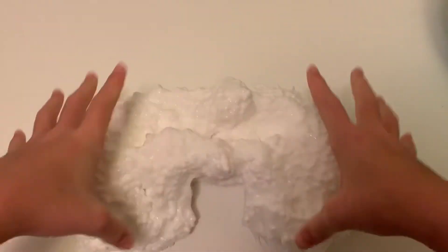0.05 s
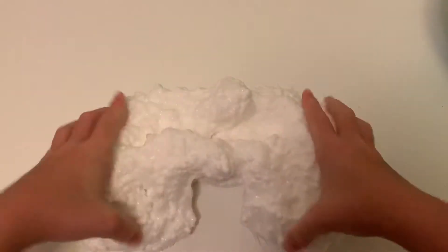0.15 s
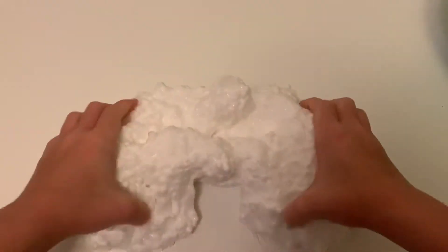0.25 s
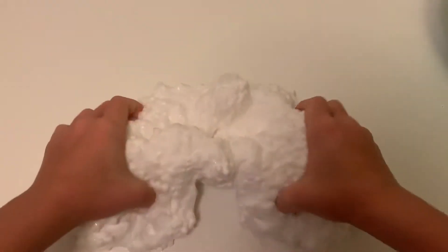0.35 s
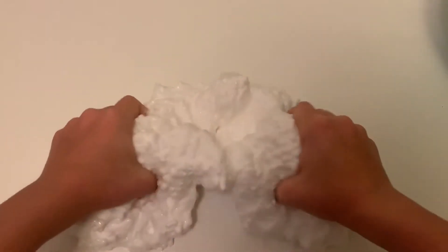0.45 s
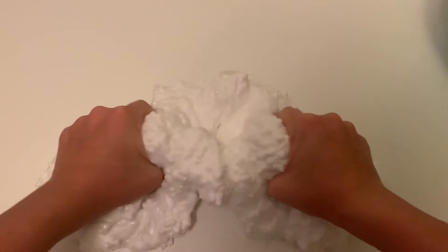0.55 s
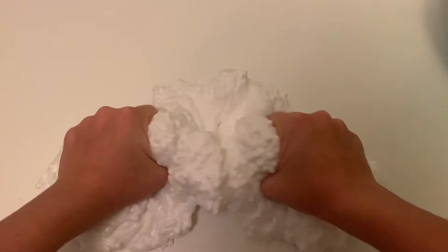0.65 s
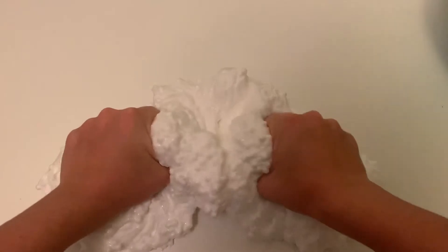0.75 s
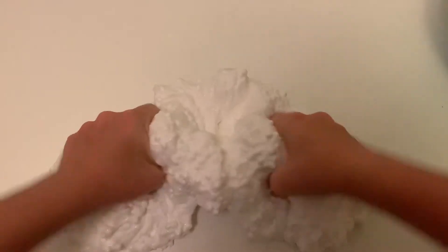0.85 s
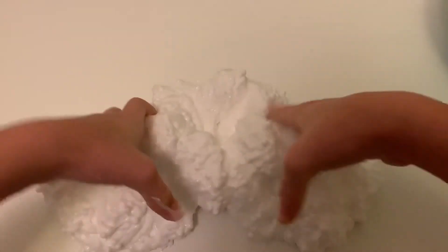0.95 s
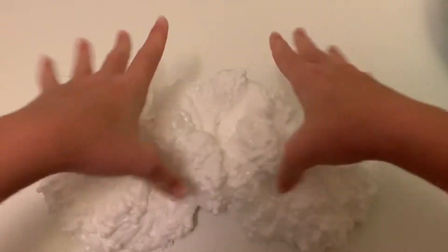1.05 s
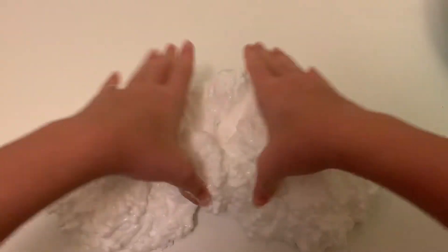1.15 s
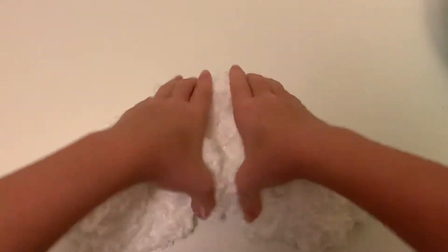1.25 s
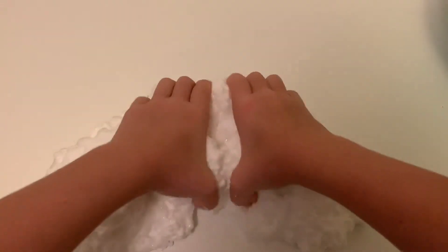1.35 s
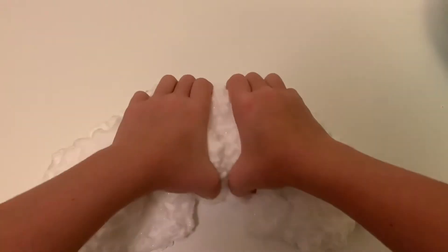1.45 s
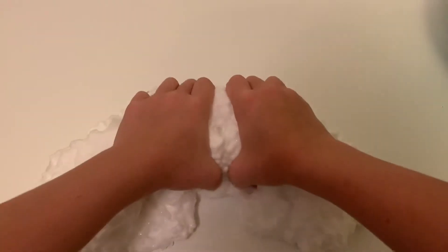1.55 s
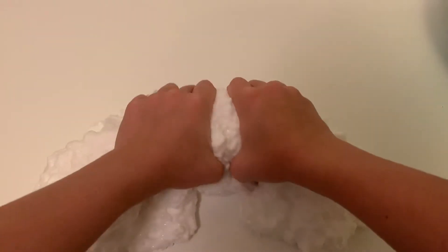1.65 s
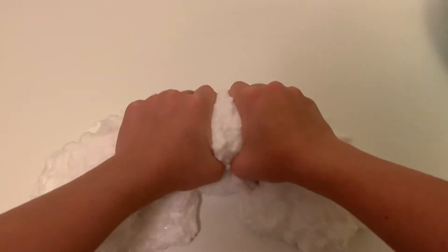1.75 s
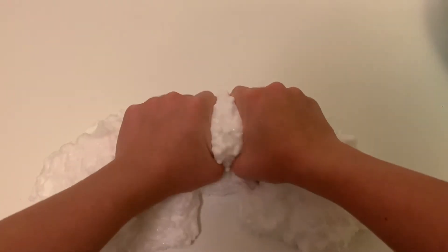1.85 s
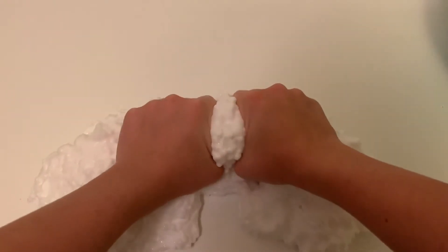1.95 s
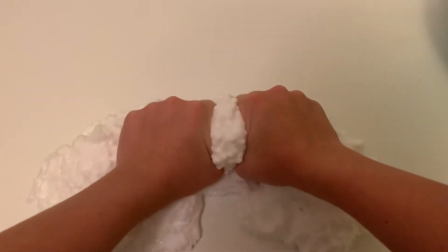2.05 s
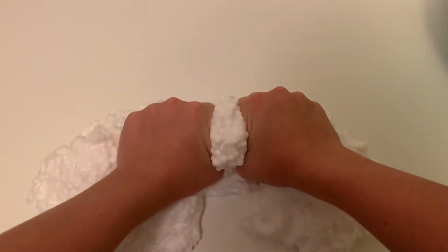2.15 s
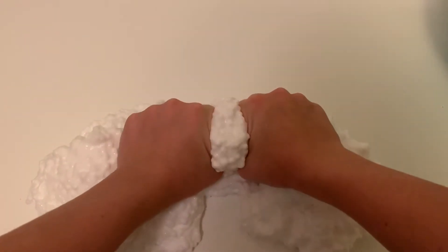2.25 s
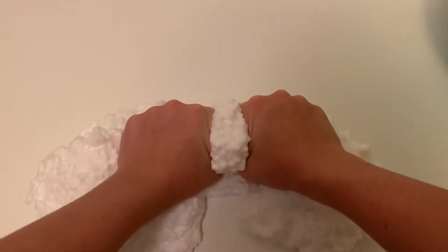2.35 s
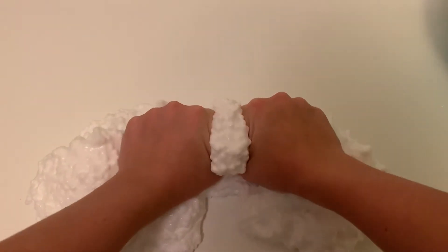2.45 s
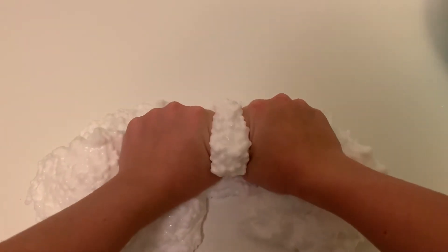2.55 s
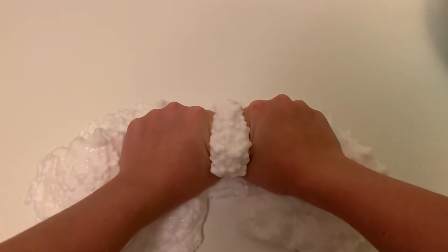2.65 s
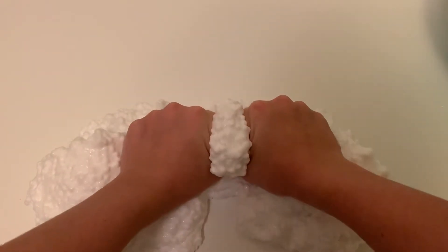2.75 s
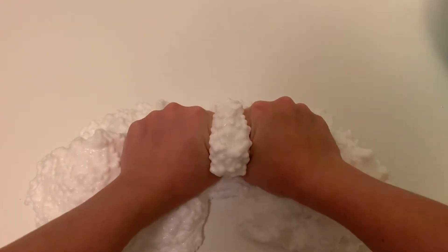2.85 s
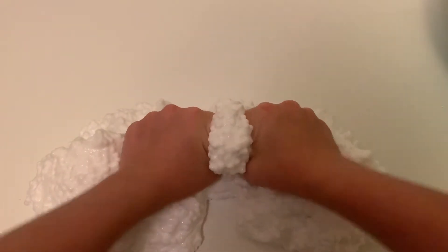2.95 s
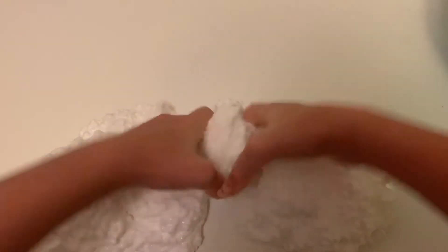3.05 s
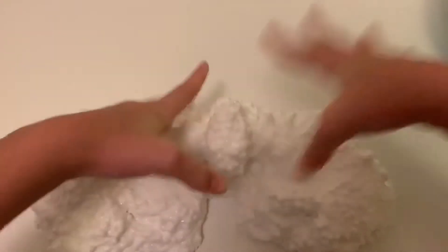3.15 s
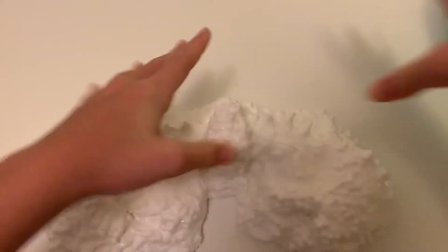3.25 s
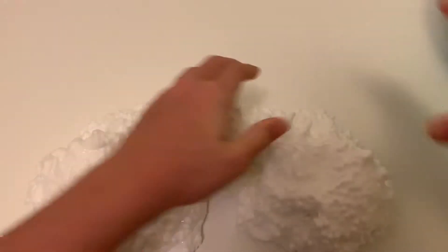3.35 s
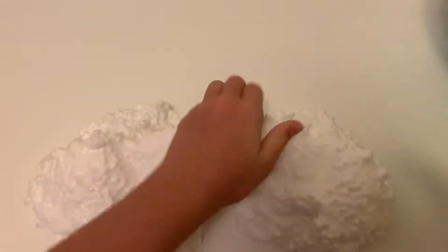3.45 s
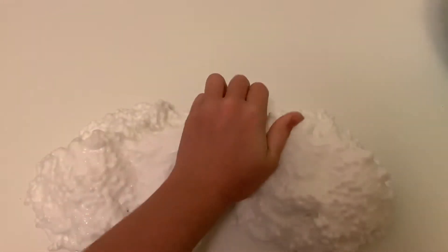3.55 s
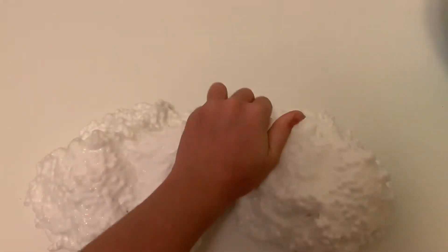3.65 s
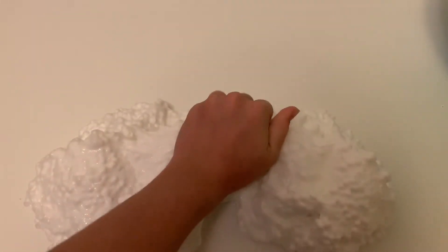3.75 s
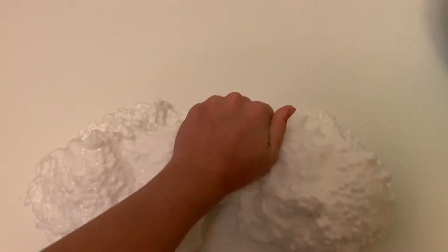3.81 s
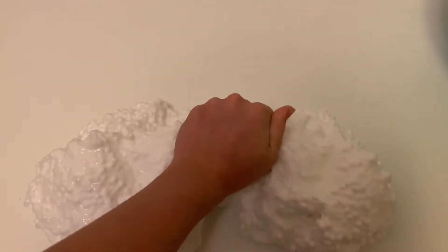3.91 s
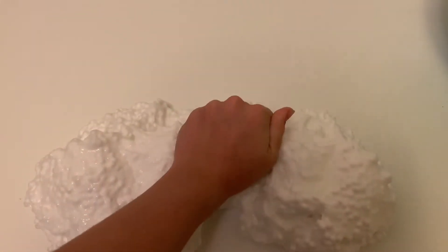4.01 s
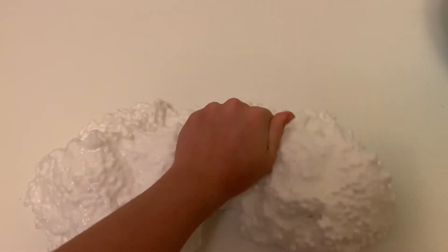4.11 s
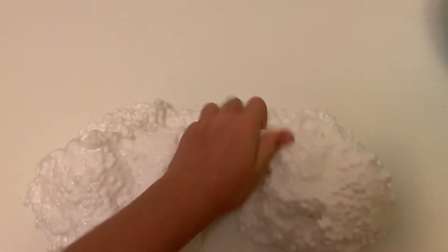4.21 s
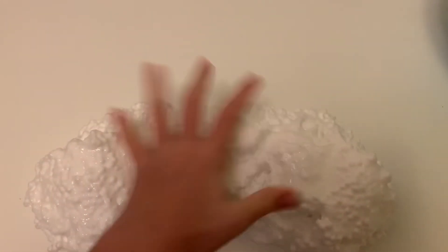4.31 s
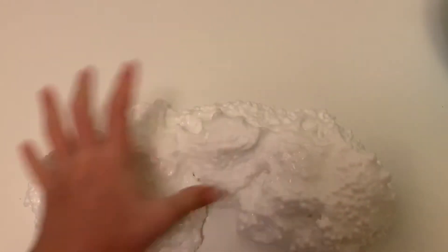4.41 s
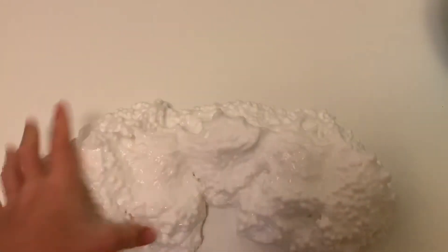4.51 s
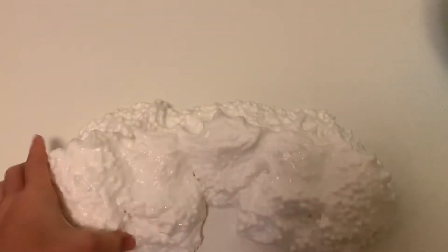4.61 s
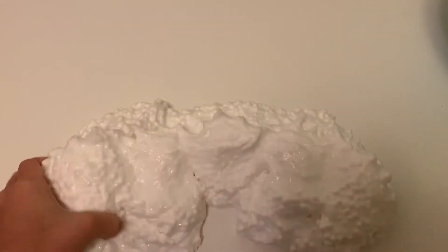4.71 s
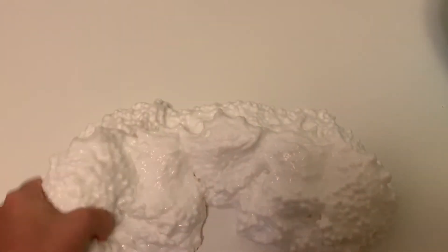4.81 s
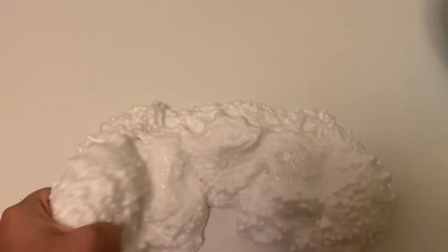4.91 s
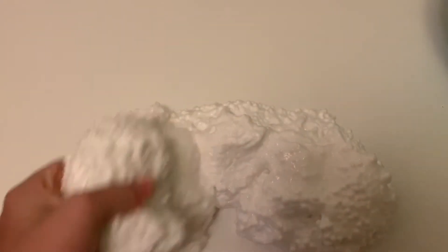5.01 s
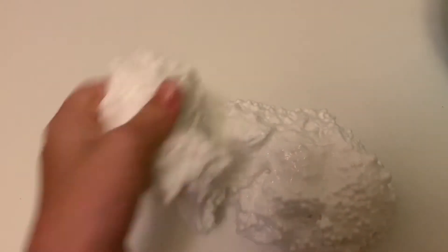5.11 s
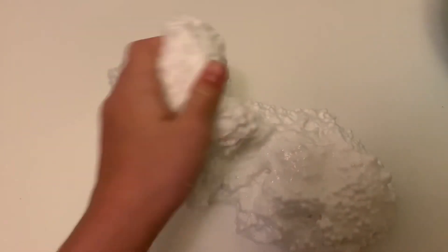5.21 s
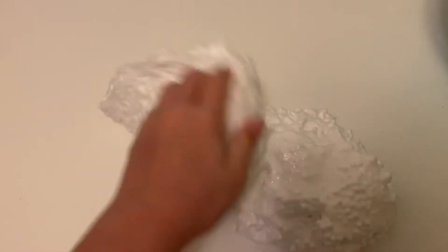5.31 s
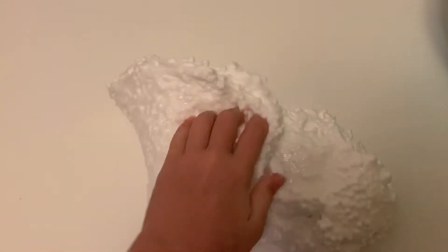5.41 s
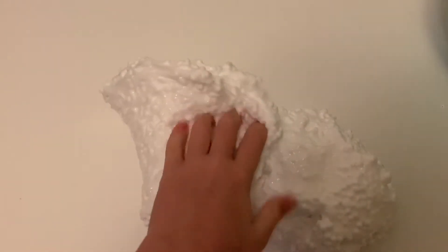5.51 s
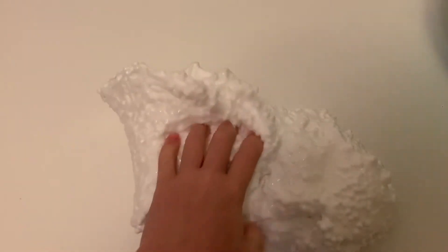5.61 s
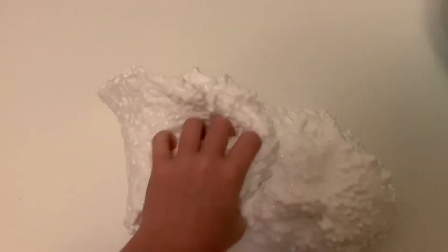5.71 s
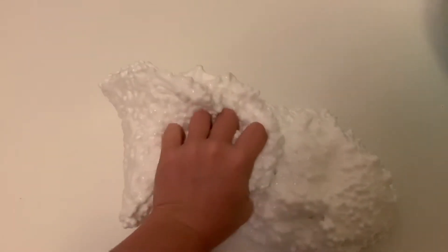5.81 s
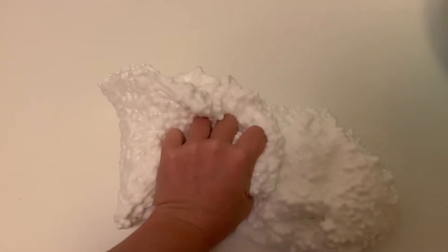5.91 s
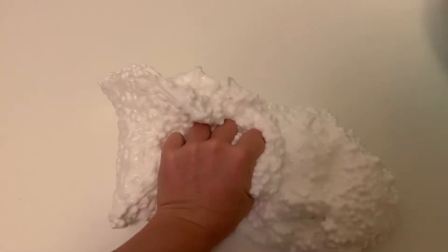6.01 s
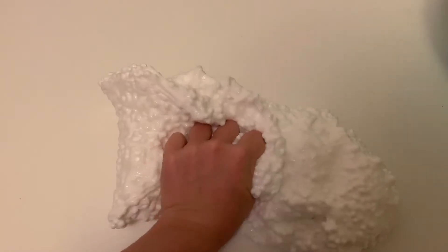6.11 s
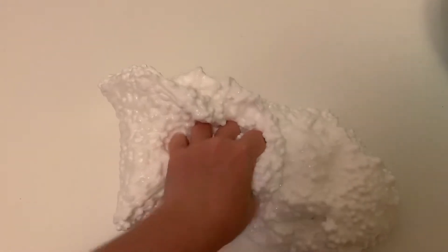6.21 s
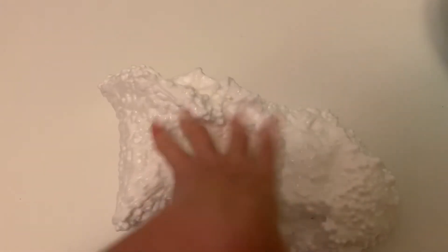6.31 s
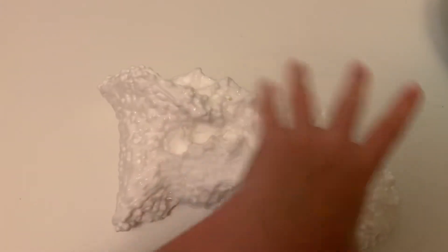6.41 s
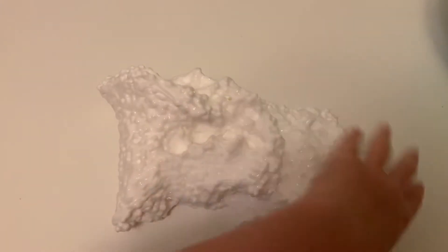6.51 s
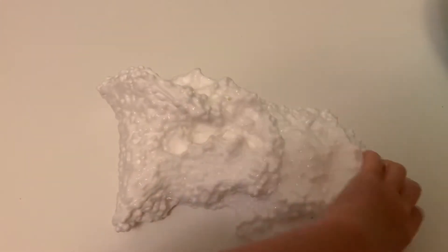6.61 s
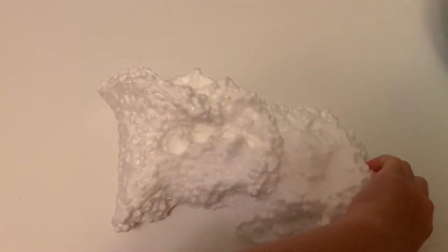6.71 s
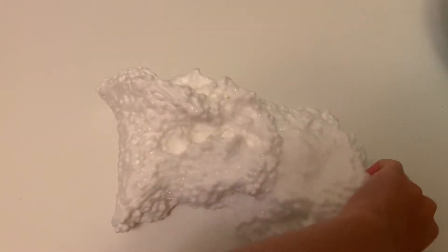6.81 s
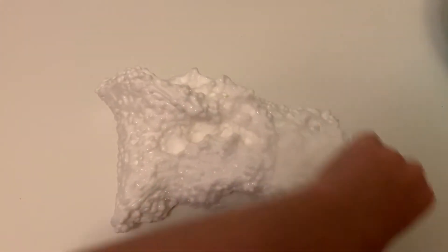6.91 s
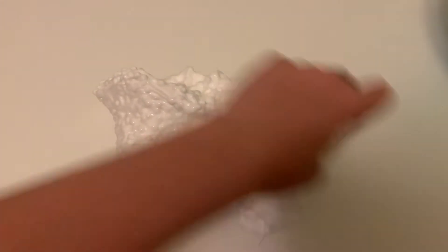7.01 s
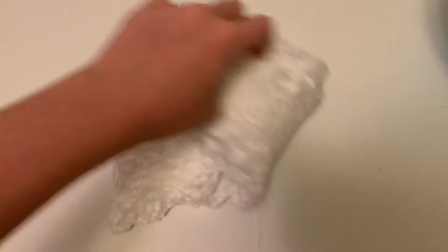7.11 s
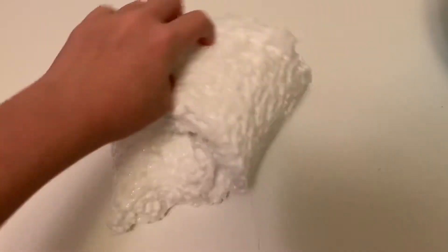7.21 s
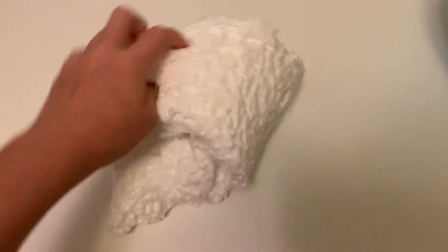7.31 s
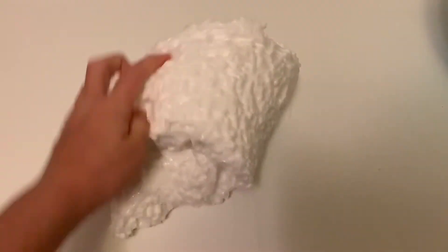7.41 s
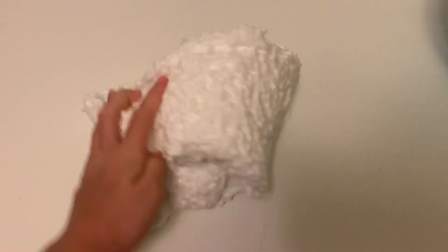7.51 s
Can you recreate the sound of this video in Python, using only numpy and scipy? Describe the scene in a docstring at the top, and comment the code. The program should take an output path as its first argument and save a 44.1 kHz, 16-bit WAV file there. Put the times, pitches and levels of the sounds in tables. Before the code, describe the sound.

Hands squeeze and peel bead-filled slime on a table, giving dense wet crunchy crackles, sharp popping air bubbles and sticky tearing, very close in stereo.

```python
"""Hands squeeze, press and peel a bead-filled slime on a table in a small room, near a pair of microphone ports.
From the start, a faint room hush (shaped noise) and low gusts of air pushed by the hands (enveloped noise)
lie under the crackle of tearing films, a random train of small bursts. From 0.2 s trapped air pockets burst as
single pops: film snap, ringing pocket, slime thump. From 0.9 s hands also pull off the sticky surface;
near 4.6 s and 6.7 s the batch is peeled off the table, whose top booms as band-shaped noise."""
import sys
import numpy as np
from scipy import signal
from scipy.fft import rfft, irfft
from scipy.io import wavfile
from scipy.ndimage import uniform_filter1d

SR = 44100
rng = np.random.default_rng(int(sys.argv[2]) if len(sys.argv) > 2 else 0)


def wav_out(sig):
    """Save sig, one row per channel (or a flat mono array), as 16-bit PCM at SR to the path in sys.argv[1]."""
    wavfile.write(sys.argv[1], SR, np.round(np.clip(np.atleast_2d(sig).T, -1, 1) * 32767).astype(np.int16))


N = 333396
PLACES = 6  # places in the slime where bursts arise
BURST_SAMPLES = 600
REFERENCE_HZ = 2600  # pocket pitch at which the size laws are neutral


def gain_of(db):
    """A level in decibels is twenty times the logarithm of an amplitude gain."""
    return 10 ** (np.asarray(db) / 20)


def evened(x):
    """Normalization: scales a signal to rms 1."""
    return x / np.sqrt(np.mean(x ** 2) + 1e-30)


def read(points, hz):
    """Interpolation of a spectrum on a logarithmic frequency axis."""
    f, value = np.transpose(points)
    return np.interp(np.log(hz + 1), np.log(f + 1), value)


def coloured(x, points):
    """Linear filtering: multiplies the spectrum by a tabulated gain."""
    hz = np.fft.rfftfreq(len(x), 1 / SR)
    return irfft(rfft(x) * gain_of(read(points, hz)), len(x))


def add(mix, s, sound):
    """Superposition: mixes a sound in at s seconds."""
    part = mix[round(s * SR):][:len(sound)]
    part += sound[:len(part)]


# spectral density of the room hush: (frequency [Hz], relative level [dB per Hz])
HUSH_COLOUR = [(60, -24), (120, -18.5), (400, 3), (1000, -5.5), (3000, -16), (6000, -18.5), (9000, -22),
               (12500, -20.5), (14000, -66)]
HUSH_DB = -78.5


def hush():
    """Stationary noise: a steady random signal is described by its spectral density."""
    return gain_of(HUSH_DB) * evened(coloured(rng.standard_normal(N), HUSH_COLOUR))


# spectral density of the moving air: (frequency [Hz], relative level [dB per Hz])
RUMBLE_COLOUR = [(12, -10.5), (20, 5), (38, -3.5), (86, -2), (200, -24), (234, -56), (300, -38.5),
                 (390, -61), (660, -120)]
# gusts from the moving hands: (time of the crest [s], level of the shared part [dB])
GUSTS = [(0.088, -46), (.42, -57.5), (.96, -52.5), (1.09, -52.5), (1.41, -68), (2.781, -69), (3.16, -49),
         (3.33, -46), (3.38, -42.5), (3.45, -50), (3.56, -58.5), (3.749, -66), (4.32, -58), (4.67, -58.5),
         (5.03, -58), (5.472, -61.5), (5.769, -52), (6.3, -59), (6.439, -51), (6.721, -59), (6.951, -59),
         (7.07, -57), (7.222, -56)]
GUST_RISE_DB_PER_S, GUST_FALL_DB_PER_S, CALM_DB = 168, 177, -72


def air():
    """Coherence: low gusts share most of their noise between the ports, with a small opposed part."""
    shared, opposed = (evened(coloured(v, RUMBLE_COLOUR)) for v in rng.standard_normal((2, N)))
    db = np.full(N, float(CALM_DB))
    for s, top_db in GUSTS:
        late = np.arange(N) / SR - s
        drop_db = np.maximum(GUST_FALL_DB_PER_S * late, -GUST_RISE_DB_PER_S * late)
        db = np.maximum(db, top_db - drop_db)
    return gain_of(db) * np.array([shared + 0.28 * opposed, shared - .24 * opposed])


STILL_DB = -81.5  # level from which each gesture rises
RISE_BEND = 0.55  # under 1 the rise is quick, then eases


def gesture(t, start, fullest, end, full_db, end_db, fall):
    """Power envelope of one layer through one gesture: rise, linear drift in decibels, exponential decay."""
    rise = np.clip((t - start) / (fullest - start), 0, 1)
    drifting_db = np.interp(t, [fullest, end], [full_db, end_db])
    db = STILL_DB + (drifting_db - STILL_DB) * rise ** RISE_BEND
    return (rise > 0) * gain_of(2 * (db - fall * np.maximum(t - end, 0)))  # doubled dB gives power


# hands pressing in: (start [s], fullest [s], end [s], pocket level at fullest [dB],
# pocket level at end [dB], snaps over pockets at fullest [dB], thumps over pockets at fullest [dB])
SQUEEZES = [(-.05, 0, 0.012, -62, -63, -5.5, -3.5), (.2, .32, 0.47, -51.5, -52, -3, -5.5),
            (.36, .5, 0.67, -53, -54.5, 4.5, -5.5), (.68, .75, 0.85, -57, -70, 3, -7.5),
            (1.295, 1.33, 1.42, -62.5, -58, -7, -3.5), (1.42, 1.62, 1.89, -56.5, -70.5, 7, -4),
            (1.86, 1.97, 2.16, -64.5, -65.5, 5, -7.5), (2.15, 2.22, 2.44, -66.5, -79.5, 5.5, -11),
            (2.4, 2.47, 2.62, -78, -84.5, 5, -8.5), (2.62, 2.72, 3.47, -79.5, -82.5, -7, -8.5),
            (3.55, 3.74, 3.82, -61.5, -66.5, 2.5, -13.5), (3.78, 3.88, 4.11, -63, -67.5, 7, -17),
            (5.1, 5.2, 5.62, -63, -71, -4.5, -7.5), (5.6, 5.84, 5.96, -52, -56.5, -2, -14.5),
            (5.86, 5.97, 5.974, -52, -55.5, 2.5, -12), (7.2, 7.28, 7.36, -60, -71.5, -2.5, -6.5),
            (7.36, 7.46, 7.76, -69, -63, 7.5, -14.5)]
# hands pulling off the sticky surface: (start [s], fullest [s], end [s], pocket level at fullest [dB],
# pocket level at end [dB], snaps over pockets at fullest [dB], thumps over pockets at fullest [dB])
RELEASES = [(.875, .92, 1.019, -44.5, -49.5, 0.16, 5), (3.005, 3.07, 3.213, -40.5, -51.5, -0.15, 0.5),
            (4.225, 4.27, 4.376, -47, -53.5, 0, -4.5), (6.245, 6.29, 6.38, -46.5, -48.5, -3.9, -1)]
# the batch peeled off the table, a grip and then the pull: (start [s], fullest [s], end [s], pocket level at
# fullest [dB], pocket level at end [dB], snaps over pockets at fullest [dB], thumps over pockets at fullest [dB])
LIFTS = [(4.643, 4.739, 4.86, -55.5, -47.5, -6, -9), (4.799, 4.962, 5.12, -43, -45.5, -1.5, -7),
         (6.665, 6.763, 6.86, -57, -49.5, -6.5, -2), (6.82, 6.959, 7.21, -42.5, -43.5, -0.5, -8)]
# drift of snaps and thumps from the pockets after the fullest moment [dB/s]
SQUEEZE_DRIFT, RELEASE_DRIFT, LIFT_DRIFT = (3, -3), (5.6, -30), (25, -14.5)
FALL_DB_PER_S = (447.5, 296.5, 209)  # snaps, pockets and thumps dying after a gesture
AFTER_DB, AFTER_FALL_DB_PER_S = -33, 229  # tearing after a pop: level under its peak, fading
SURGE_DB, SURGE_S = 2.5, .04  # uneven pressure: rms depth, smoothing time


def effort():
    """Addition of powers: gains of snaps, pockets and thumps from all gestures, surging a little."""
    t = np.arange(0, N / SR, 1 / 1000)
    power = np.zeros((3, len(t)))
    kinds = (SQUEEZES, SQUEEZE_DRIFT), (RELEASES, RELEASE_DRIFT), (LIFTS, LIFT_DRIFT)
    for rows, (snap_drift, thump_drift) in kinds:
        for start, fullest, end, full_db, end_db, snap_db, thump_db in rows:
            layers = (snap_db, snap_drift), (0, 0), (thump_db, thump_drift)
            for k, (over_db, drift) in enumerate(layers):
                last_db = end_db + over_db + drift * (end - fullest)
                power[k] += gesture(t, start, fullest, end, full_db + over_db, last_db, FALL_DB_PER_S[k])
    # films keep tearing for a moment after each pop
    for s, snap_db, _, pocket_db in POPS:
        fading_db = AFTER_DB - AFTER_FALL_DB_PER_S * np.abs(t - s)
        power[:2] += (t > s) * gain_of(2 * (fading_db + [[snap_db], [pocket_db]]))
    surge = evened(uniform_filter1d(rng.standard_normal(power.shape), round(SURGE_S / t[1]), axis=1))
    gains = np.sqrt(power) * gain_of(SURGE_DB * surge)
    return [np.interp(np.arange(N) / SR, t, g) for g in gains]


def ring(hz, turns, lag, glide):
    """Damped oscillation: a soft-edged ring that sags in pitch; its envelope crests after `turns` cycles."""
    u = np.maximum(np.arange(BURST_SAMPLES) / SR - lag, 0) * hz / turns
    envelope = np.e * u * np.exp(-u)  # peak 1
    return envelope * np.sin(2 * np.pi * turns * u * (1 - glide * np.tanh(u)))


def trailing(x, turns):
    """Dispersion: low tones arrive later, by a phase lag growing with log frequency."""
    hz = np.fft.rfftfreq(len(x), 1 / SR)
    return irfft(rfft(x) * np.exp(-2j * np.pi * turns * np.log(1 + hz / 150)), len(x))


# film snap: (frequency [Hz], gain [dB])
SNAP = [(3000, -12), (5500, -5), (8000, 1.5), (10500, -1.5), (13000, -3), (15600, -6), (16400, -47.5)]
# air spat from a pocket of the reference pitch: (frequency [Hz], gain [dB])
SPLASH = [(400, -29.5), (900, -17), (2200, 13.5), (4500, 11), (7000, -26)]


def burst(chance, pocket_hz, thump_hz):
    """Impulsive excitation of a cavity: film snap, then spat air and pocket ring, then slime thump; peaks 1."""
    t = np.arange(BURST_SAMPLES) / SR - .001
    away = np.maximum(t, -1.5 * t)  # the attack is steeper than the decay
    snap = coloured(chance * np.exp(-away / .00028), SNAP)
    shifted = [(hz * np.sqrt(pocket_hz / REFERENCE_HZ), db) for hz, db in SPLASH]  # big pockets spit lower
    spit = coloured(chance[::-1] * np.exp(-away / 0.00019), shifted)
    pocket = ring(pocket_hz, turns=0.49, lag=0.0008735, glide=0.0043) + .8 * spit / abs(spit).max()
    thump = ring(thump_hz, turns=0.73, lag=0.00227, glide=0.16)
    return [p / abs(p).max() for p in (snap, trailing(pocket, turns=.9), thump)]


POCKET_TILT_DB = 1  # per octave: small pockets crack louder


def crackle(count=24):
    """Shot noise: random small bursts of many sizes, clumped when sparse, faster as films tear harder."""
    clumps_db = 5.0 * evened(uniform_filter1d(rng.standard_normal(N), size=500))
    gains = effort()
    per_s = np.clip(1800 * (gains[1] / gain_of(-57)) ** .6, 180, 4500)
    clumped_per_s = per_s * gain_of(clumps_db * (600 / per_s) ** .25)
    size = gain_of(2.4 * np.minimum(rng.exponential(1, N), 4.2)) / np.sqrt(per_s)
    size *= rng.choice([-1., 1.], N) * (rng.random(N) < clumped_per_s / SR)
    kind, parts = rng.integers(0, count, N), np.zeros((3, PLACES, N))
    pitches = zip(rng.permutation(np.geomspace(800, 5500, count)), np.geomspace(250, 640, count))
    for k, (pocket_hz, thump_hz) in enumerate(pitches):
        chance = rng.standard_normal(BURST_SAMPLES)
        shapes = np.array([evened(p) for p in burst(chance, pocket_hz, thump_hz)])
        shapes *= gain_of(2.67 * rng.standard_normal((3, 1)))  # some mostly snap, some mostly ring
        shapes[1] *= gain_of(POCKET_TILT_DB * np.log2(pocket_hz / REFERENCE_HZ))
        train = (size * (kind == k))[None]
        parts[:, k % PLACES] += signal.oaconvolve(train, shapes, axes=1)[:, :N]
    return sum(g * evened(p) / np.sqrt(PLACES) for g, p in zip(gains, parts))


# the loud pops: (time [s], film snap peak level [dB], pocket pitch [Hz], pocket peak level [dB])
POPS = [(0.228, -61, 2240, -42.5), (0.267, -33, 1176, -44), (0.2974, -37, 3520, -36.5),
        (0.3233, -26.0, 3130, -22), (0.339, -35.0, 3710, -34), (0.3797, -37.0, 1723, -24.0),
        (0.387, -22, 3090, -31.5), (0.413, -23, 2470, -23), (0.4542, -21.5, 3620, -21.5),
        (0.477, -20, 2190, -30), (0.4862, -25.0, 4220, -23.5), (0.549, -25.5, 2346, -45.5),
        (0.56, -28, 2026, -41), (0.578, -31.5, 2300, -30), (0.6104, -23, 3640, -30),
        (0.6203, -25, 4040, -20), (0.6278, -35, 4150, -29.5), (0.7419, -17, 3730, -28.0),
        (0.7541, -24, 1935, -45), (0.867, -31, 1970, -58.5), (0.9057, -20.5, 822, -36),
        (0.9218, -27.5, 2550, -26.5), (0.941, -26, 2620, -29.5), (1.312, -58.5, 1660, -37.5),
        (1.327, -34, 903, -41.5), (1.333, -39.5, 1815, -47), (1.3808, -32.5, 1243, -53),
        (1.4055, -30.5, 2040, -26.5), (1.4182, -21.5, 4150, -38.5), (1.4694, -38, 1760, -31.5),
        (1.5163, -32, 2220, -27.5), (1.5246, -38.5, 1420, -44), (1.5352, -32.5, 2234, -26.5),
        (1.5786, -27.5, 2325, -32), (1.5952, -25, 820, -31), (1.612, -23.5, 3340, -32.5),
        (1.637, -11.5, 2640, -20.5), (1.6514, -29, 2330, -28.5), (1.667, -29.5, 2455, -37),
        (1.6771, -20.5, 3480, -27.5), (1.6905, -23, 3400, -17), (1.702, -21.5, 3250, -28),
        (1.79, -20, 3590, -20.5), (1.919, -33.5, 2240, -49.5), (1.9383, -27, 3880, -41.5),
        (1.995, -33, 2090, -48.5), (2.0364, -60.5, 887, -40.5), (2.0544, -23.5, 3020, -45),
        (2.0742, -28.5, 3520, -48), (2.0836, -24.5, 2940, -29), (2.1731, -35, 2500, -46.5),
        (2.189, -19, 3930, -30.5), (2.2838, -39.5, 2360, -60), (2.3019, -50, 3560, -38),
        (2.4328, -34.5, 3760, -48.5), (2.519, -55, 3860, -48.5), (2.6763, -61, 2280, -45.0),
        (2.699, -30.5, 3420, -39), (2.824, -70, 3020, -49.5), (3.0441, -42.5, 3540, -31.5),
        (3.0612, -25.5, 3090, -23.5), (3.1521, -22, 2700, -31.5), (3.5857, -42, 1460, -35.5),
        (3.5976, -36, 1650, -47), (3.695, -56, 2100, -41.5), (3.7197, -29.0, 2985, -32.0),
        (3.8465, -32.5, 3820, -28.5), (3.8934, -28.5, 2870, -40.5), (3.9111, -14.5, 4400, -18),
        (3.9763, -24, 2970, -39), (4.0004, -32, 2510, -42.5), (4.0247, -15.5, 1550, -29.5),
        (4.081, -24.5, 3120, -45.5), (4.1043, -29.5, 3620, -43.5), (4.2282, -36.5, 1397, -49),
        (4.653, -60.5, 1500, -51), (4.7456, -33.5, 1370, -46), (4.7866, -40.5, 1870, -34.5),
        (4.797, -25.5, 2060, -38.5), (4.881, -23.5, 2520, -29.5), (4.8887, -25, 2450, -28),
        (4.973, -35, 2730, -28.5), (5.0956, -21.5, 1362, -35), (5.1333, -28, 3230, -38),
        (5.1661, -22, 3530, -39.5), (5.2103, -30, 1615, -43.5), (5.2857, -27.5, 3600, -44.5),
        (5.3623, -36.5, 1654, -42.5), (5.4342, -39, 1617, -32), (5.513, -54.5, 2330, -42.5),
        (5.598, -35.5, 1985, -50.5), (5.6303, -52.5, 1870, -37.5), (5.6405, -27.5, 3060, -43),
        (5.6892, -45.5, 1633, -28.5), (5.7414, -31.5, 1190, -45.5), (5.8067, -26.5, 2270, -30),
        (5.8267, -34, 1820, -29.5), (5.8404, -23.5, 2260, -40.5), (5.862, -54, 1610, -30),
        (5.8703, -21.5, 2140, -35), (5.8766, -26, 3145, -40.5), (5.891, -23, 3290, -39.5),
        (5.9042, -55, 1027, -35.5), (5.9204, -18.5, 2404, -23.5), (5.9631, -24, 3020, -37.5),
        (6.011, -27, 3220, -39.5), (6.02, -26, 3950, -37.5), (6.0404, -15.5, 3090, -35),
        (6.0886, -34.5, 1100, -46), (6.1358, -35, 2600, -40), (6.1505, -38.5, 1370, -30.5),
        (6.2448, -37.5, 3000, -37.5), (6.2731, -20, 3010, -30.5), (6.285, -30, 1540, -35),
        (6.695, -60, 692, -43.5), (6.7545, -32, 984, -45), (6.7666, -25, 826, -38.5),
        (6.7776, -33.5, 842, -40), (6.7897, -24.5, 4030, -32.5), (6.8514, -23.5, 3490, -21.5),
        (6.9255, -51.5, 1836, -23), (6.9316, -12, 1760, -22), (6.9426, -24, 2674, -27.5),
        (6.9761, -45.5, 1915, -23.5), (7.024, -19, 2016, -29.5), (7.059, -40.5, 1190, -33.5),
        (7.0836, -27.5, 2860, -29), (7.1017, -17, 1704, -29.5), (7.2103, -34.5, 3050, -23),
        (7.2208, -39.5, 3340, -31.5), (7.2702, -31.5, 4290, -40), (7.3654, -37, 1206, -50),
        (7.4379, -37.5, 2730, -42), (7.5207, -33.5, 2710, -51)]
THUMP_DB, THUMP_DB_PER_OCTAVE = -22, -4  # thump relative to its pocket; deeper pockets thump more


def pops():
    """Cavity resonance: each loud pop is a short cluster, with weaker copies of itself scattered around it."""
    out = np.zeros((PLACES, N))
    chance = rng.standard_normal((len(POPS), BURST_SAMPLES + 1))
    copies = rng.random((len(POPS), 5, 2))
    for (s, snap_db, hz, pocket_db), c, scattered in zip(POPS, chance, copies):
        snap, pocket, thump = burst(c[:-1], hz, 540 * gain_of(1.1 * c[0]))
        sound = gain_of(snap_db) * snap + gain_of(pocket_db) * pocket
        thump_db = pocket_db + THUMP_DB + THUMP_DB_PER_OCTAVE * np.log2(hz / REFERENCE_HZ)
        place = out[int(abs(c[-1]) * 1000) % PLACES]  # a chance place
        add(place, s - .0011, sound + gain_of(thump_db) * thump)
        for when, weak in scattered:
            add(place, s - .003 + .006 * when, sound * gain_of(-14 - 12 * weak))
    return out


# single echoes from table and walls: (nominal delay [s], level [dB])
ECHOES = [(.0015, -11.5), (.0038, -22.5), (0.01, -26.5)]
# decay of the room: (frequency [Hz], time to fall 60 dB [s])
ROOM = [(300, 0.31), (1000, 0.08), (3000, 0.23), (8000, 0.18), (15000, 0.096)]


def room(x):
    """Reverberation: a few single echoes, and sparse random-sign taps with each band decaying at its own rate."""
    taps = np.zeros(SR // 3)
    at = np.arange(200, len(taps) - 20, 20)
    taps[at + rng.integers(0, 20, len(at))] = rng.choice([-1., 1.], len(at))
    hz, t, z = signal.stft(taps, SR, nperseg=256)
    decay = gain_of(-60 * t / read(ROOM, hz)[:, None])
    tail = signal.istft(z * decay, SR, nperseg=256)[1]
    tail *= gain_of(-10.0) / np.linalg.norm(tail)
    for s, db in ECHOES:
        add(tail, s * rng.uniform(.8, 1.5), gain_of([db]))
    return signal.oaconvolve(x, tail)[:N]


# port differences: (frequency [Hz], phase spread per unit of scatter [rad], left over right [dB])
PORTS = [(0, .28, 0), (500, .36, 2.3), (1200, .6, 3), (2200, 1.4, 1.3), (4000, 1.8, -2), (5800, 2.2, -2.5),
         (7200, .65, 0), (16000, .4, 0)]
# common phase difference: (frequency [Hz], lead of the left port over the right [rad])
LEAD = [(0, 0), (1600, -.2), (3000, 1.5), (5500, 3.5), (6500, 2.2), (7800, 0), (15400, -12.57)]


def ports(x, scatter):
    """Interchannel phase: the ports hear each place with its own phase; in the treble the left lags."""
    hz = np.fft.rfftfreq(N, 1 / SR)
    f, *columns = np.transpose(PORTS)
    spread, louder_db = (np.interp(hz, f, c) for c in columns)
    turn = np.interp(hz, *np.transpose(LEAD)) + spread * scatter
    left = gain_of(louder_db / 2) * (rfft(x) * np.exp(1j * turn)).sum(0)
    right = gain_of(-louder_db / 2) * rfft(x.sum(0))
    return irfft([left, right], N)


# spectral density of the table's low boom: (frequency [Hz], relative level [dB per Hz])
TABLE_COLOUR = [(80, -28), (115, -3), (140, 3.5), (175, -21), (260, -54)]
TABLE_DB = -7.5  # over the thumps of the lifts


def table():
    """Plate resonance: the table top booms softly in a low band while the batch is pulled off it."""
    t = np.arange(N) / SR
    power = np.zeros(N)
    for start, fullest, end, full_db, end_db, _, thump_db in LIFTS:
        power += gesture(t, start, fullest, end, full_db + thump_db, end_db + thump_db, FALL_DB_PER_S[2])
    boom = evened(coloured(rng.standard_normal(N), TABLE_COLOUR))
    return gain_of(TABLE_DB) * np.sqrt(power) * boom


def scene():
    """Direct and diffuse fields: bursts come from their places, echoes and hush from all around."""
    slime = pops() + crackle()
    places = np.linspace(-1.6, 1.6, PLACES)[:, None]
    direct = ports(slime, places)
    # a phase wandering over frequency makes the field diffuse
    around = evened(uniform_filter1d(rng.standard_normal(N // 2 + 1), size=400))
    diffuse = ports((sum(map(room, slime)) + hush())[None], 0.36 * around)
    return direct + diffuse + air() + table()


def record(dry):
    """Band limitation: a linear-phase low-pass at 16.9 kHz."""
    lowpass = signal.firwin(511, 16900, window=("kaiser", 9), fs=SR)
    return signal.oaconvolve(dry, lowpass[None], "same")


dry = scene()
out = record(dry)
wav_out(out)
```